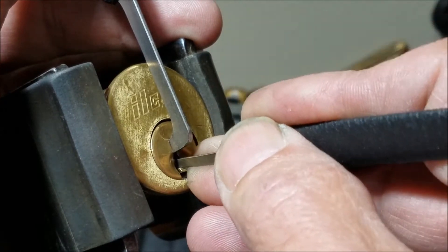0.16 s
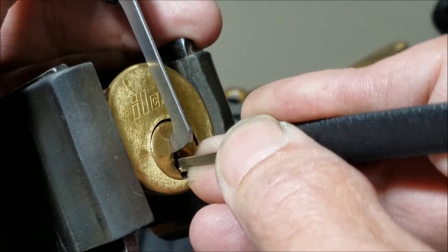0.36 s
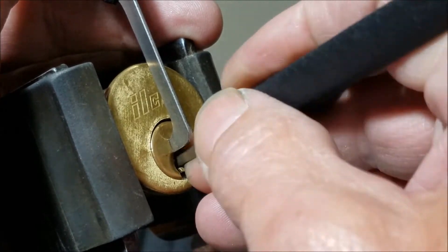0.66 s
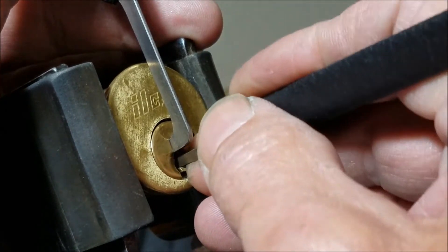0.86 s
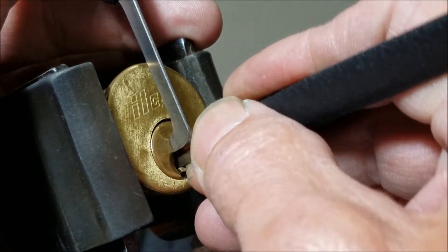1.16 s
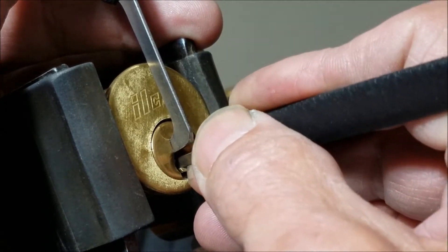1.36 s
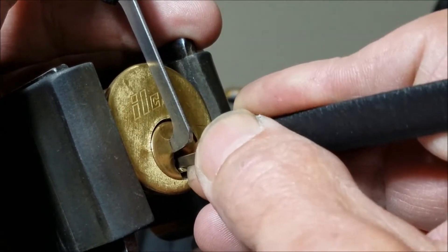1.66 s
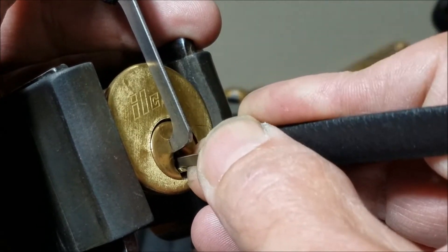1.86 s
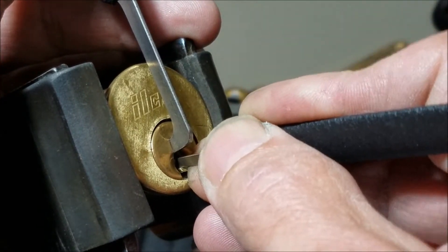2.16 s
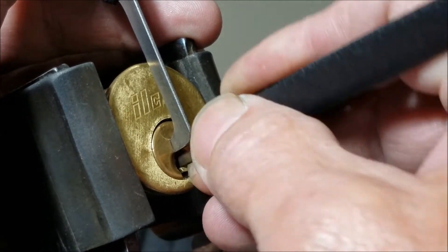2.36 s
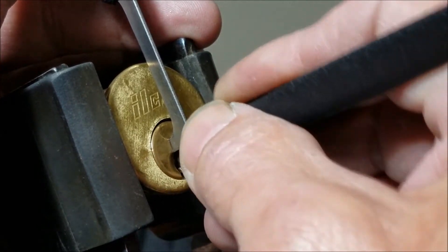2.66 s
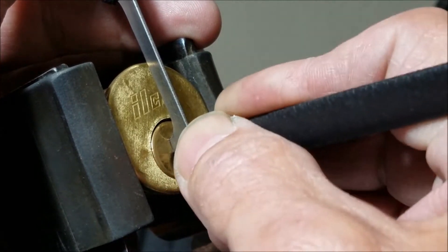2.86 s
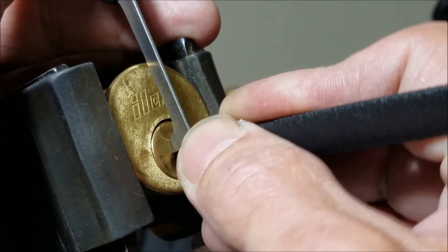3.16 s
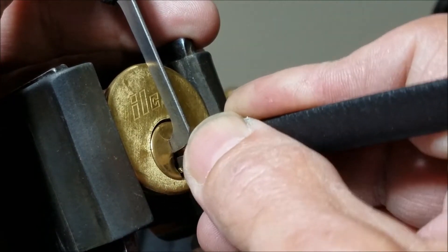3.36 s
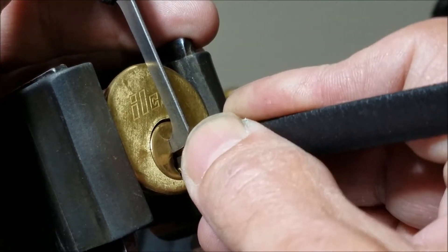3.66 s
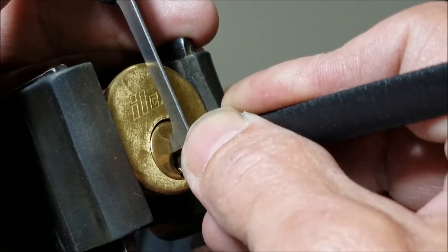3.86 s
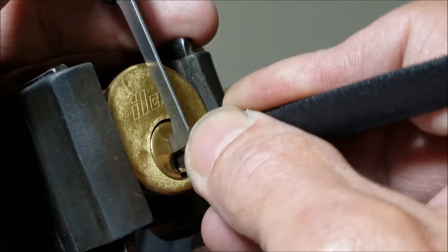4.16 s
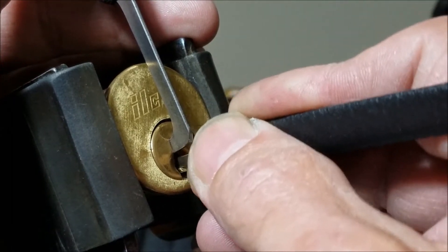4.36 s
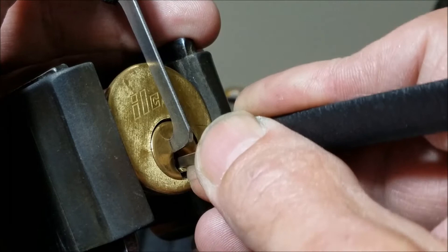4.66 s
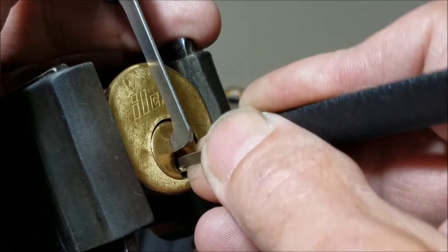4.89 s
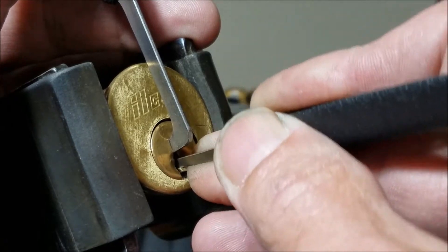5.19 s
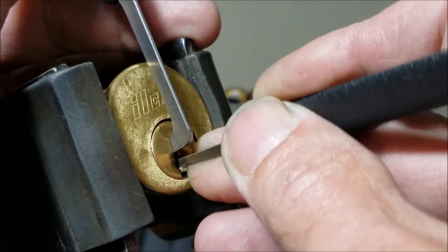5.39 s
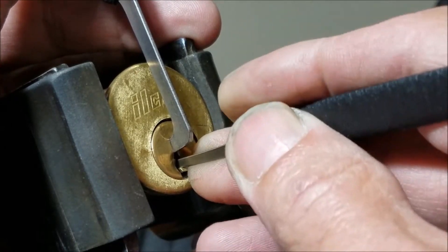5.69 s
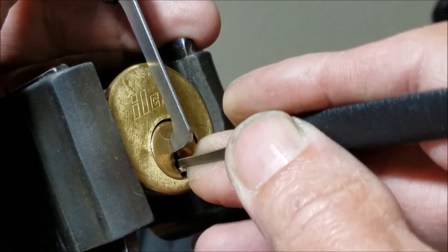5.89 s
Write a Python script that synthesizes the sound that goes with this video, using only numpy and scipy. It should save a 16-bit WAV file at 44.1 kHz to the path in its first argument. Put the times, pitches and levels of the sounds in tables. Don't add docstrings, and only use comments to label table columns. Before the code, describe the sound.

A close, dry stereo pickup by a phone on a workbench, a hand's width from a brass lock in a vice. Throughout, a quiet fan hums low with soft air hiss, and a steady, extremely high thin whine wavers slightly. A steel pick rubs the keyway with barely audible grit. From 0 to 1.2 seconds there are dull, hollow bench knocks, faint ticks and short low creaks around 0.5. At 1.3 a pin snaps; at 1.53 comes the hardest crack, with a short metallic ring and woody thump. More snaps follow at 1.86, 2.1 and a double near 2.3, with small taps between. After a sparser stretch, clear snaps land at 3.44, 4.0, 4.37 and 4.67. From 5 to 5.5 there are brief creaks, bright sharp clicks at 5.14 and 5.47, and quick scraping hisses, then tiny ticks until 6 seconds.

```python
import sys
import numpy as np
from scipy import signal
from scipy.fft import rfft, irfft
from scipy.io import wavfile
from scipy.ndimage import uniform_filter1d

SR = 44100
rng = np.random.default_rng(int(sys.argv[2]) if len(sys.argv) > 2 else 0)


def level_to_linear(level):
    exponent = np.asarray(level, float) / 20
    return 10 ** exponent


def materialize(psi):
    bounded = np.clip(np.atleast_2d(psi).T, -1, 1)
    quanta = np.round(bounded * 32767).astype(np.int16)
    wavfile.write(sys.argv[1], SR, quanta)


N = 266055

# time in seconds, rumble into the bench in dB.
PICK_PRESSURE = [(0.0, -65), (0.37, -80), (0.64, -61), (0.91, -80), (1.12, -54.5), (1.44, -68),
                 (1.61, -44.5), (1.72, -72), (2.29, -63), (2.45, -79), (2.92, -58), (3.07, -61), (3.8, -77),
                 (4.38, -54), (4.86, -54), (5.19, -54.5), (5.45, -52.5), (6.03, -97)]
# pitch in Hz, level in dB, decay by 60 dB in seconds.
LOCK_MODES = [(985, -17, .12), (1120, -14, .16), (1340, -17, .08), (1735, -8, .1), (1812, 1, .085),
              (2200, -10, .08), (2300, -5, .08), (2460, -5, .1), (2620, -7, .07), (2900, -12, .06),
              (3120, -14, .08)]
# start in seconds, crack in dB, brightness in dB, knock in dB.
PIN_SHIFTS = [(0.429, -72, -8, -55.5), (.665, -72, 0, -67), (0.7116, -65, 12, -50), (1.0943, -53, -11, -49),
              (1.2374, -58, -2, -51), (1.5215, -72, 0, -45), (1.786, -70, 0, -54.5),
              (1.7996, -59, -3, -44.5), (2.2764, -56, -6, -38.5), (2.2915, -62, 0, -45),
              (2.346, -55, -3, -63), (2.716, -70, 0, -58.5), (3.032, -57.5, -8, -40),
              (3.997, -68, -4, -49.5), (4.212, -72, 0, -58), (4.245, -63, 19, -51.5), (4.613, -70, 2, -56),
              (4.824, -72, 0, -52), (5.0404, -57, 11, -43), (5.2544, -58, 3, -47), (5.344, -66, 0, -49),
              (5.4139, -51, 17, -57), (5.723, -73, 0, -54.5), (5.7474, -58.5, -10, -56.5),
              (5.8247, -55, 11, -47)]
# start in seconds, crack in dB, brightness in dB,
# knock in dB, wrench ring in dB re the knock.
PIN_SETS = [(1.2763, -55.5, 11, -38.5, -26), (1.5293, -35, 13, -22, -14), (1.8597, -48.5, -21, -45, -20),
            (2.086, -41.5, -20, -44.5, -17), (2.3018, -51, -8, -35.5, -26), (2.325, -50.5, 3, -33.5, -28),
            (3.4406, -37, 4, -35, -25), (4.0107, -45, -14, -45, -20), (4.371, -43, -10, -35.5, -24),
            (4.6652, -41.5, -12, -30.5, -18), (5.1399, -34.5, 22.5, -34.5, -29),
            (5.4668, -41, 23, -40.5, -4)]


def band(x, lo_hz, hi_hz):
    return signal.sosfilt(signal.butter(2, [lo_hz, min(hi_hz, .45 * SR)], "band", fs=SR, output="sos"), x)


def ring(x, modes):
    out = 0
    for hz, db, t60 in modes:
        r = np.exp(-np.log(1000) / (t60 * SR))
        w = 2 * np.pi * hz / SR
        out = out + level_to_linear(db) * signal.lfilter([0, r * np.sin(w)], [1, -2 * r * np.cos(w), r * r], x)
    return out


def curves(table):
    s, *columns = np.transpose(table)
    return [np.interp(np.arange(N) / SR, s, c) for c in columns]


def walk(rate):
    hold = int(SR / rate)
    steps = np.repeat(rng.standard_normal(N // hold + 1), hold)
    return 1.69 * uniform_filter1d(uniform_filter1d(steps, hold), hold)[:N]


def grit(per_s, spread_db):
    hits = rng.random(N) < per_s / SR
    x = hits * level_to_linear(spread_db * rng.exponential(size=N)) * rng.standard_normal(N)
    return x / x.std()


def room():
    # frequency in Hz, density in dB per Hz.
    air_colour = [(25, -23), (45, -13), (75, -7), (220, -8), (340, -6.5), (610, -13.5), (930, -13),
                  (1900, -20), (3050, -19), (3600, -28), (4900, -30), (6500, -33.5), (9000, -38),
                  (11500, -32)]
    # frequency in Hz, share from 0 to 1.
    likeness = [(60, 0.78), (200, 0.73), (400, 0.37), (800, 0.037), (1400, 0.011), (14000, 0.05)]
    # centre in Hz, width in Hz, rms level in dB.
    fan_hum = [(60, 24, -78), (91, 22, -76), (148, 22, -70.5), (172, 16, -75), (222, 18, -73)]
    hz = np.maximum(np.fft.rfftfreq(N, 1 / SR), 1)
    colour_hz, colour_db = np.transpose(air_colour)
    alike_hz, share = np.transpose(likeness)
    colour = level_to_linear(np.interp(np.log(hz), np.log(colour_hz), colour_db))
    alike = np.clip(np.interp(np.log(hz), np.log(alike_hz), share), 0, 1)
    colour = colour / (1 + (hz / 13300) ** 40)
    mid, side = rfft(rng.standard_normal((2, N))) * colour
    air = irfft(mid * np.sqrt(1 + alike) + side * np.sqrt(1 - alike) * np.array([[1], [-1]]), N)
    air = air * level_to_linear(-59.5 + .5 * walk(1.6)) / air.std()
    for centre_hz, width_hz, db in fan_hum:
        drone = band(rng.standard_normal(N), centre_hz - width_hz / 2, centre_hz + width_hz / 2)
        air = air + drone * level_to_linear(db + 1.5 * walk(1.5)) / drone.std()
    return air * level_to_linear([[-.6], [.6]])


def whine():
    # time in seconds, left level in dB, right level in dB.
    hand_shade = [(0.0, -30.5, -36.5), (0.4, -31.5, -34.5), (0.9, -31.5, -35), (1.18, -31.5, -37),
                  (1.5, -28, -34.5), (2.03, -29.5, -34), (2.31, -31, -33.5), (2.59, -32.5, -34),
                  (2.87, -29.5, -35.5), (3.16, -29.5, -34), (3.72, -28, -36.5), (4.4, -29, -35),
                  (4.9, -28.5, -37.5), (5.42, -30, -36), (5.7, -31, -34.5), (6.04, -31.5, -36)]
    phase_rad = (-.3, .0)
    line_hz = 15734.975
    t = np.arange(N) / SR
    tone = np.cos(2 * np.pi * line_hz * t + np.array(phase_rad)[:, None])
    flutter = 1 + 0.023 * np.array([walk(90), walk(90)]) + 0.069 * walk(2.98)
    return tone * flutter * level_to_linear(3.5 + np.array(curves(hand_shade)))


def scrape():
    # start in seconds, rise in seconds, fall in seconds,
    # hiss in dB, body in dB re the hiss.
    slides = [
        (2.272, 0.044, .05, -72, 12),
        (5.116, 0.019, 0.12, -59.5, 7.5),
        (5.245, 0.021, .008, -63, 6),
        (5.405, 0.013, 0.016, -56.5, 7),
        (5.431, 0.0362, 0.016, -44, -0.5),
        (5.47, 0.0083, 0.074, -60.5, 9),
    ]
    slide_from_db, slide_to_db = -28, -14.5
    grit_db = -77.5 + 0.086 * (curves(PICK_PRESSURE)[0] + 62)
    drag = np.array([grit(2500, 3), grit(2500, 3)])
    out = level_to_linear(grit_db) * band(band(drag, 4000, 12500), 3000, 13000)
    t, top, body = np.arange(N) / SR, 0, 0
    for s, rise, fall, hiss_db, body_db in slides:
        on = uniform_filter1d(1. * ((t > s) & (t < s + rise + fall)), size=200)
        swell_db = np.interp(t - s, [0, rise, rise + fall], [slide_from_db, 0, slide_to_db])
        slide = on * level_to_linear(hiss_db + swell_db)
        top = top + slide
        body = body + slide * level_to_linear(body_db)
    rasp = np.array([grit(3000, 3), grit(3000, 3)])
    hiss = band(band(rasp * top, 7500, 14000), 7000, 14500)
    rasp = rasp * body
    out = out + hiss * level_to_linear([[5.5], [3]]) + band(rasp, 4500, 6060)
    return out + level_to_linear(4.5) * band(rasp, 880, 2900) + level_to_linear(-33.5) * ring(rasp, LOCK_MODES)


def bench():
    # pitch in Hz, level in
    # dB, decay by 60 dB in seconds.
    low_modes = [(251, -33, .25), (345, -27, .1), (405, -22, .15), (430, -10.5, .05), (465, -16, .19),
                 (601, -17, .025)]
    main_mode = [(504.6, 0, .064)]
    high_modes = [(509.7, -12.7, .2), (549, -14, .19)]
    # start in seconds, knock in dB, upper over lower modes in dB.
    nudges = [(.032, -47, -0.5), (.139, -50, 6), (.162, -49, 15), (.312, -52, -2), (.458, -55, 13),
              (.486, -44.5, 5), (.629, -49, 9), (.838, -53, 8), (.869, -52, 11), (1.014, -51.5, 9),
              (1.062, -44, 8), (1.212, -53, 7), (1.362, -51.5, -6), (1.409, -51.5, 2), (1.903, -49.5, 3),
              (2.311, -39, 19), (2.37, -42.5, 6), (2.772, -49.5, 11.5), (2.884, -50.5, 4), (2.996, -57, 3),
              (3.319, -55, 6), (3.923, -55, 13), (4.338, -50, 5), (4.538, -47.5, 10), (4.695, -60, -10),
              (4.786, -50, 10), (4.952, -41, 2), (5.232, -40, 4.5), (5.351, -39.5, 3), (5.53, -47.5, 10)]
    lead_s, pin_tilt_db = .0013, 1.5
    main, high, low = np.zeros((3, N))
    knocks = [(row[0] - lead_s, row[3], pin_tilt_db) for row in PIN_SETS + PIN_SHIFTS]
    for s, db, tilt_db in knocks + nudges:
        i = int(s * SR)
        main[i] += level_to_linear(db + 7.5)
        high[i] += level_to_linear(db + 7.5 + tilt_db / 2)
        low[i] += level_to_linear(db + 7.0 - tilt_db / 2)
    rub = level_to_linear(curves(PICK_PRESSURE)[0] - 24) * grit(400, 3)
    sides = ring(low + rub, low_modes) + ring(high + rub, high_modes)
    top = band(sides - ring(main + rub, main_mode), 150, 900)
    return np.array([level_to_linear(-1.1) * np.roll(top, -6), level_to_linear(1.1) * top])


def pins():
    # start in seconds, crack in dB, brightness in dB.
    taps = [(0.5654, -60, 14), (0.7188, -53, 20.5), (0.7406, -57, 15), (1.3332, -58, 4), (1.6298, -55, -3),
            (3.4507, -55, 23), (3.776, -60, 6), (4.13, -60, -5), (4.6733, -47, 7), (4.9026, -61, 4),
            (4.9827, -62.5, 24), (5.1691, -52, -3), (5.4374, -57, 21), (5.4794, -46, 5), (5.4964, -62, 0)]
    # pitch in Hz, level in dB, decay by 60 dB in seconds.
    wrench_modes = [(4085, -8, .1), (4105, 0, .1), (5712, -20, .08)]
    # centre in Hz, width in Hz, level in dB.
    keyway = [(5150, 700, 3), (8500, 1300, -1), (6500, 5200, -11)]
    crack_s, top_crack_s, rattle_s, air_rattle_s = .0019, .0009, .024, .019
    bounce_s, bounce_db = .0055, -10
    t = np.arange(SR // 6) / SR
    low, mid, air = np.zeros((3, 2, N + len(t)))
    lock, wrench = np.zeros((len(LOCK_MODES), N)), np.zeros(N)
    for s, _, _, knock_db, wrench_db in PIN_SETS:
        wrench[int((s + .008) * SR)] += level_to_linear(knock_db + wrench_db)
    ticks = [(s, db, tone, db - 10 + 0.39 * (knock - db)) for s, db, tone, knock, _ in PIN_SETS]
    ticks += [(s, db, tone, db - 9.5) for s, db, tone, *_ in PIN_SHIFTS + taps]
    for s, db, bright_db, lock_db in ticks:
        mid_db = -10.5 + 0.34 * bright_db
        air_db = -13 + bright_db
        noise = rng.standard_normal((4, len(t)))
        wave = (0.98 * noise[0] + 0.73 * noise[1:3]) * level_to_linear(db)
        wave = wave * 1.5 * level_to_linear(db) / wave[:, :60].std()
        chatter = level_to_linear(4 * np.repeat(noise[3], 60)[:len(t)])
        crack = np.exp(-t / crack_s)
        rattle = chatter * np.exp(-t / rattle_s)
        air_rattle = chatter * np.exp(-t / air_rattle_s)
        at = slice(int(s * SR), int(s * SR) + len(t))
        low[:, at] += wave * (crack + level_to_linear(-18) * rattle)
        mid[:, at] += wave * (crack + level_to_linear(-12.5) * rattle) * level_to_linear(mid_db)
        air[:, at] += wave * (np.exp(-t / top_crack_s) + level_to_linear(-23) * air_rattle) * level_to_linear(air_db)
        signs = rng.choice([-1, 1], (3, len(LOCK_MODES)))
        shares = level_to_linear(2 * rng.standard_normal((3, len(LOCK_MODES)))) * signs
        for k, late in enumerate(np.cumsum(rng.uniform(.7, 1.3, size=3)) * bounce_s):
            lock[:, int((s + late) * SR)] += level_to_linear(lock_db + k * bounce_db) * shares[k]
    low = band(band(low, 1180, 3350), 620, 3260)
    mid = sum(level_to_linear(4.5 + db) * band(mid, hz - width_hz / 2, hz + width_hz / 2) for hz, width_hz, db in keyway)
    air = band(band(air, 10500, 14300), 9800, 14800)
    out = (level_to_linear(9) * low * level_to_linear([[-1], [1]]) + mid + air * level_to_linear([[6.5], [2.5]]))[:, :N]
    cylinder = sum(ring(blows, [mode]) for blows, mode in zip(lock, LOCK_MODES))
    out = out + cylinder * level_to_linear([[-2], [0]]) + ring(wrench, wrench_modes) * level_to_linear([[-9], [-4]])
    return np.array([out[0], np.roll(out[1], 7)])


def creak():
    # start in seconds, length in seconds, pitch in Hz, level in dB.
    chatters = [
        (0.503, 0.028, 535, -53.5),
        (0.528, 0.031, 538, -44),
        (0.564, 0.049, 536, -53),
        (5.048, 0.046, 539.5, -47),
        (5.181, 0.037, 534.5, -49.5),
    ]
    rise_s, fall_s = .01, 0.0082
    t, out = np.arange(N) / SR, 0
    for s, length, hz, db in chatters:
        swell = np.interp(t - s, [-rise_s / 2, rise_s, length, length + fall_s], [0.0078, 0.86, 0.75, 0])
        pitch_hz = hz * (1 + .012 * walk(60))
        wobble = level_to_linear(1.2 * walk(90)) * np.sin(2 * np.pi * np.cumsum(pitch_hz) / SR)
        out = out + swell * level_to_linear(db + 4) * wobble
    return out * level_to_linear([[-1], [1]])


def scene():
    return room() + whine() + scrape() + bench() + pins() + creak()


def band_limit(x):
    return signal.sosfilt(signal.butter(12, 15745, fs=SR, output="sos"), x)


def record(dry):
    return band_limit(dry)


dry = scene()
out = record(dry)
materialize(out)
```